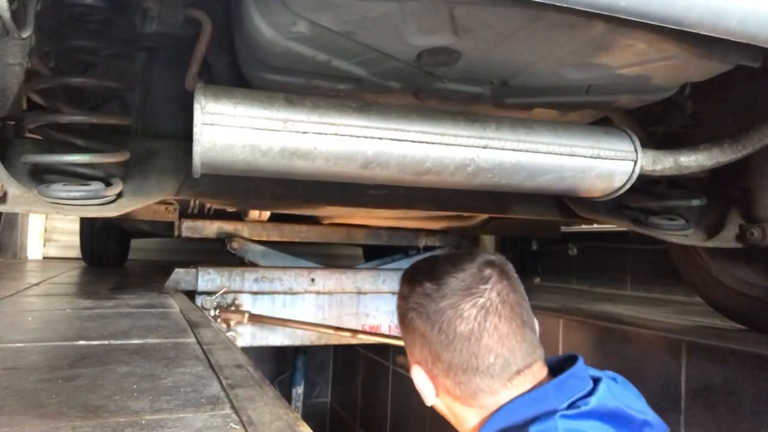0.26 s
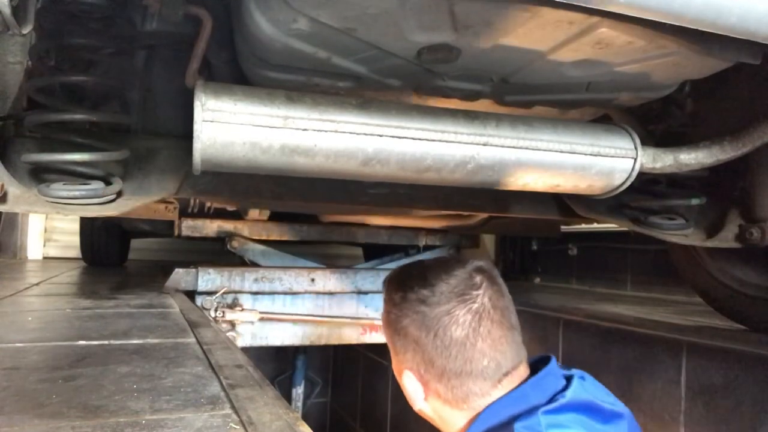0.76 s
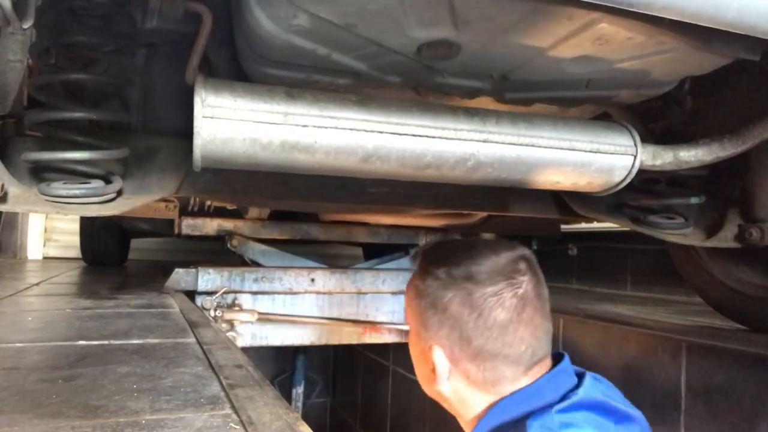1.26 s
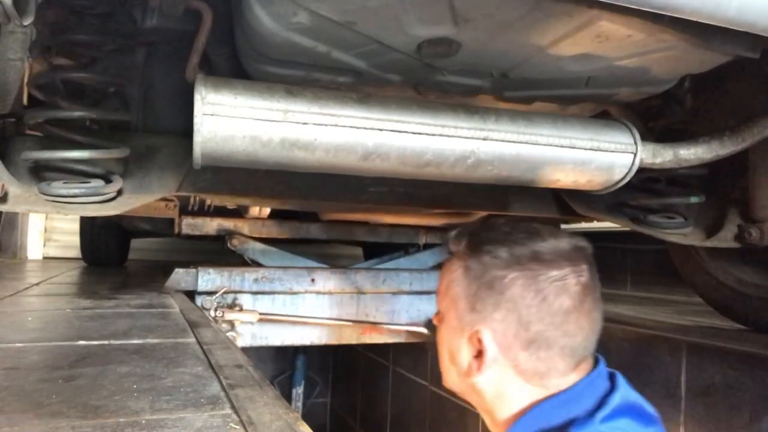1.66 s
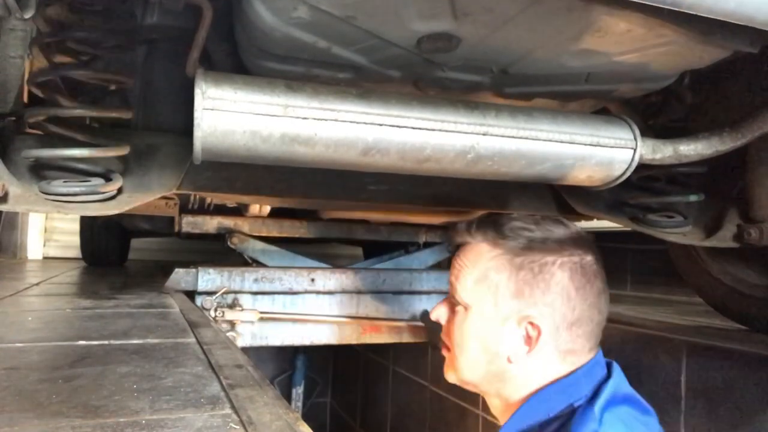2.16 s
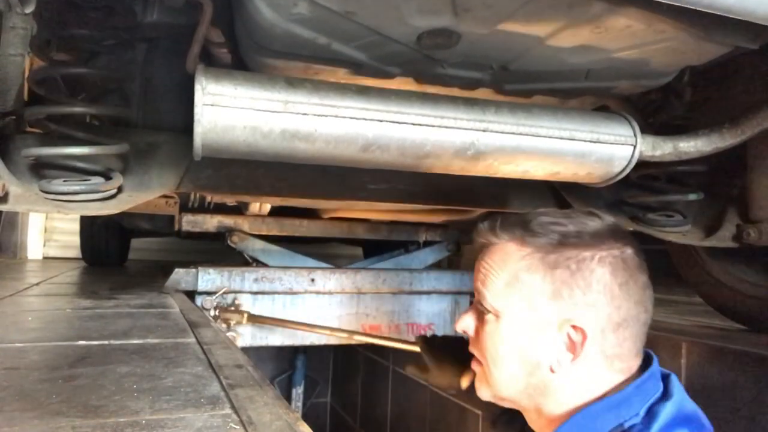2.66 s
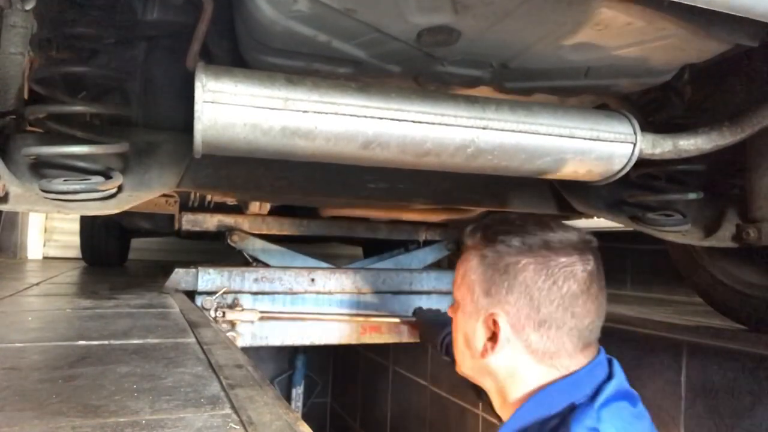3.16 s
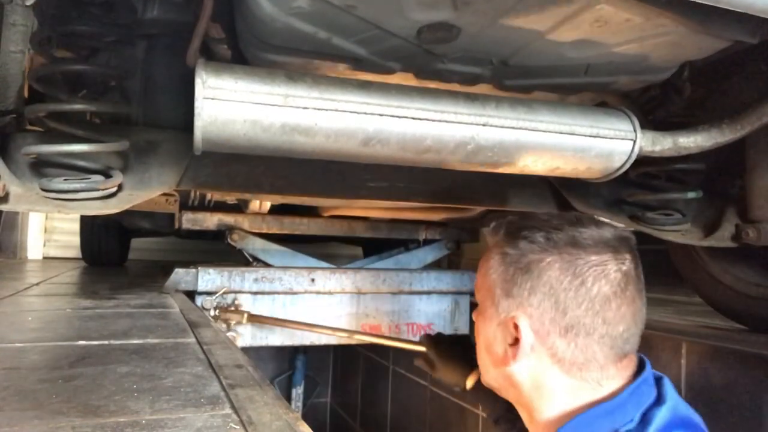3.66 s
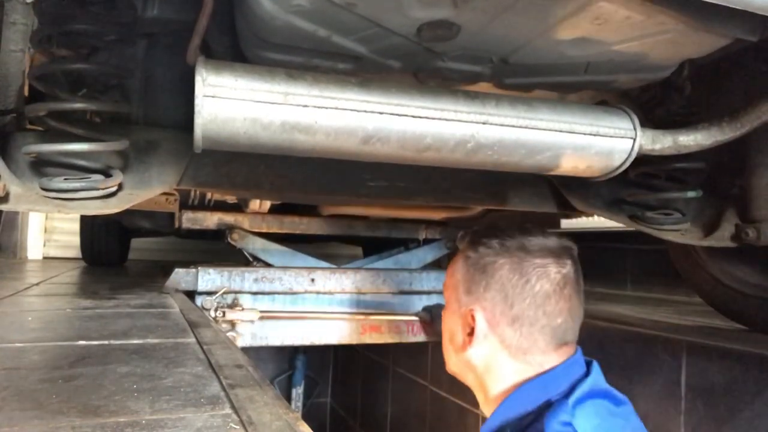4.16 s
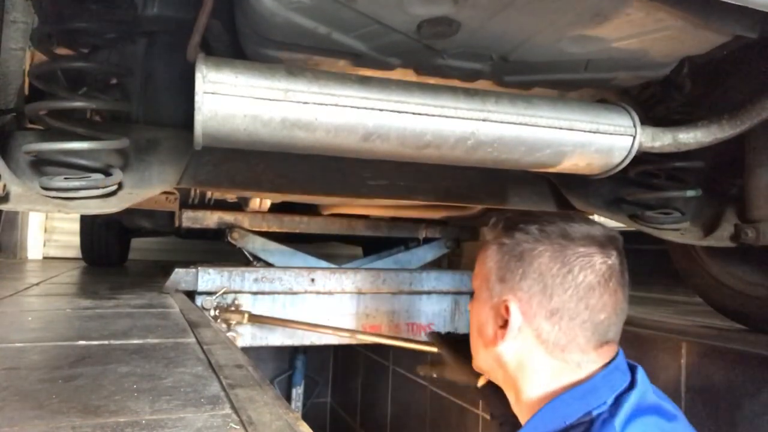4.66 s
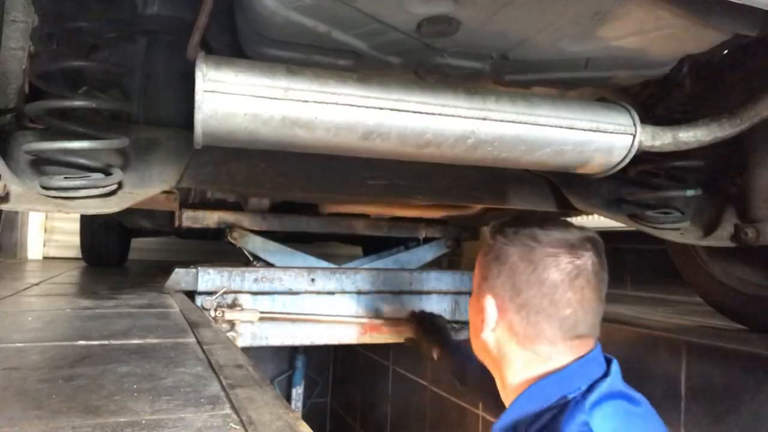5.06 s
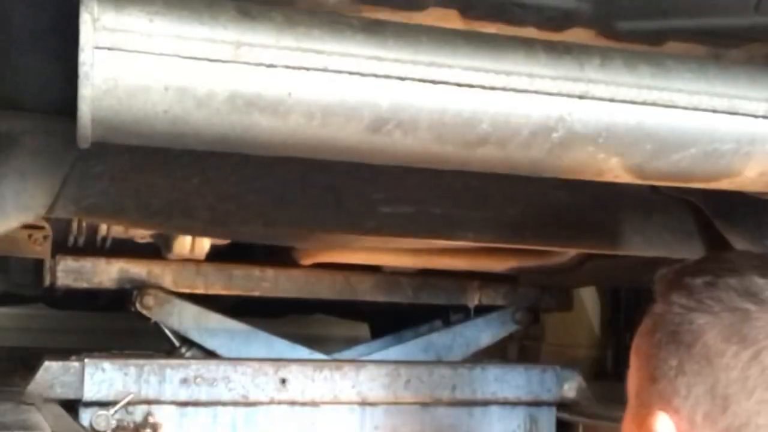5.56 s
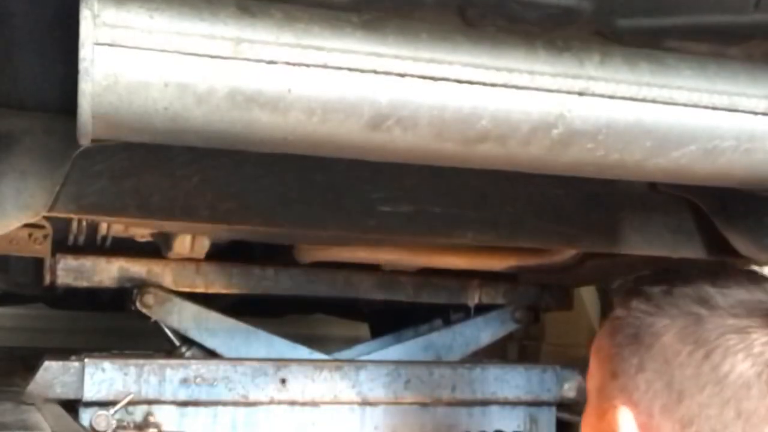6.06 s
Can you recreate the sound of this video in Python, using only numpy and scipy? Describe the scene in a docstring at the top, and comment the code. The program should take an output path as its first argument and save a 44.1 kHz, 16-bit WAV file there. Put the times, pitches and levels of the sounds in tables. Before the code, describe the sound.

A hand-pumped hydraulic scissor jack lifts a car in a garage, heard from behind the pit. From 0.1 seconds its steel lever knocks against lower and upper stops in turn, fourteen times, each with a short metallic ring. The knocks come about 0.4 seconds apart, slowing to about half a second after 3.4, with the last near 6.0. The last three upper knocks are heavier in the bass. Loose pins tick lightly just before each knock. Oil hisses faintly between strokes, with a tiny high valve whistle on each push and a soft sleeve brush on each lift. The loaded scissor arms give sharp, bright snaps at about 0.9, 3.0 and 3.6 seconds. Dull knocks fall near 0.4, 2.8 and 3.7, with the strongest at 5.7. Underneath are quiet, steady garage air and a low rumble that swells after the heavy blows.

```python
"""The steel lever of a hand-pumped hydraulic scissor jack knocks as it lifts a car over a garage pit.
The lever hits a stop at the end of every down and up stroke, which sets the jack's frame ringing.
Its loose pins tick, oil hisses and whistles through the valves, and a sleeve brushes on each lift.
Now and then the loaded scissor arms slip with a sharp snap, or the car or the lever gives a dull knock.
Under it all lie steady garage air and a low rumble that the heavy blows stir up."""
import sys
import numpy as np
from scipy import signal
from scipy.io import wavfile
from scipy.ndimage import uniform_filter1d

SR = 44100
rng = np.random.default_rng(int(sys.argv[2]) if len(sys.argv) > 2 else 0)


def dump_mix(stems):
    """Bounce the given channels to the path in sys.argv[1] as a 16-bit WAV at rate SR."""
    frames = np.atleast_2d(stems).T  # one column per channel
    limited = np.clip(frames, -1, 1)  # hard clip at full scale
    pcm = np.round(limited * 32767).astype(np.int16)
    wavfile.write(sys.argv[1], SR, pcm)


N = 278712
TIME = np.arange(N) / SR
AGE = np.arange(int(.8 * SR)) / SR   # seconds since one sound began
BAND_EDGES_HZ = np.r_[np.geomspace(22, 5600, 25), 6600, 7700, 8900, 10000, 11300, 13500, 16500]
BAND_HZ = np.sqrt(BAND_EDGES_HZ[1:] * BAND_EDGES_HZ[:-1])
BLOW_SCATTER_DB = 1.5   # how much each ringing tone varies from blow to blow

# Thud, clang and edge mean extra bass, middle and treble. Slack is the time from first pin tick to stop.
# The lever hits its lower stop: start_s, strength_db, thud_db, clang_db, edge_db,
# slack_s, first_pin_db, second_pin_db, pin_edge_db, refill_hiss_db
DOWN_STOPS = [(0.095, 1.5, 0, -2.5, -12, 0.03, -3, 8, -8.5, -65.5),
              (0.897, 3, -1.5, -3.5, 0.5, .028, 2.5, 4.5, -7, -64),
              (1.729, 4, -1.5, -4.5, -3, 0.068, -13, 0.5, -22, -58.5),
              (2.55, 5, -2, -5, -3, 0.074, -11.5, 2, -16, -61),
              (3.419, 1, -1.5, -5, -2, 0.055, -2, -7.5, -12, -56),
              (4.457, 1.5, -2, -6, -3, 0.056, -1, 2, -10.5, -56.5),
              (5.516, 0.5, -3.5, -5.5, -7, 0.056, -4.5, 3, -4, -57.5)]
# The lever hits its upper stop: start_s, strength_db, thud_db, clang_db, edge_db,
# slack_s, first_pin_db, second_pin_db, pin_edge_db, sleeve_db, whistle_db, whistle_length_s
UP_STOPS = [(0.459, 2, 0.5, -3.5, -10, .076, -3, -4, -1.5, -66, -65, 0.072),
            (1.309, 1.5, -2, -1.5, -9, 0.075, -1.5, 1.5, -24, -65, -67, .07),
            (2.132, 2, 0.5, -2, -8.5, .080, -3.5, 7, -7.5, -66, -67.5, 0.059),
            (2.977, 1, 1, 1, -9, 0.059, -3.5, -3, -13, -70, -76, 0.063),
            (3.946, -1, 8, 3, -6.5, .099, 4.5, -5.5, -6.5, -71, -67, .045),
            (5.016, 1, 7.5, -0.5, -10, 0.11, 1, -6.5, -9.5, -63, -67.5, 0.062),
            (6.042, -0.5, 7, 2.5, -8, .086, 2.5, -6.5, -10, -76, -68.5, 0.11)]
# The scissor joints slip: start_s, strength_db, thud_db, clang_db, edge_db, top_db (extra above 10 kHz)
SNAPS = [(.926, 3.5, 2.5, 0, -4.5, 2.5), (3.020, -19, -9.5, 9.5, 7, -0.5), (3.032, -6, 4.5, -4, 3.5, -6.5),
         (3.582, -1, -0.5, -0.5, -0.5, -9)]
# Dull knocks: the load shifts, or the lever knocks softly just before its upper stop:
# start_s, strength_db, thud_db, clang_db, edge_db
THUMPS = [(.425, -8.5, -2, -6, -18), (2.758, -6, 4, 2.5, -1.5), (2.871, -19.5, 14.5, 4.5, 0),
          (3.191, -30, 8, 14, 3), (3.655, -10.5, 6, 9, -2), (4.015, -17.5, 17.5, 17.5, -0.5),
          (5.266, -31, -1.5, 14.5, -3.5), (5.745, 4, -1, -1.5, -8)]
# Modes (natural ringing tones) of frame and lever; t60 is the time to fade by 60 dB:
# pitch_hz, t60_s, down_stop_db, up_stop_db, thump_db, tick_db
FRAME_MODES = [(79, .35, -34, -41, -35, -65), (112, .7, -48, -37, -36, -65), (128, .4, -46, -41, -50, -65),
               (185, .4, -36, -35, -46, -60), (298, .45, -38, -40, -39, -56), (333, .7, -48, -48, -51, -60),
               (392, .35, -42, -52, -48, -60), (426, .3, -40, -44, -39, -58),
               (530, .27, -38, -35, -55, -52), (545, .3, -41, -36, -48, -55),
               (562, .31, -28, -31, -32, -52), (598, .28, -36, -50, -42, -60),
               (617, .3, -29, -36, -36, -58), (666, .32, -33, -37, -37, -56), (722, .3, -50, -41, -41, -58),
               (1034, .38, -41, -50, -44, -58), (1047, .3, -48, -43, -50, -60),
               (1131, .22, -35, -62, -50, -68), (1166, .24, -27, -60, -43, -66),
               (1236, .2, -40, -47, -52, -64), (1280, .22, -43, -54, -50, -66),
               (1810, .2, -41, -52, -46, -66), (2220, .2, -42, -52, -47, -64),
               (2820, .18, -39, -45, -75, -53), (2880, .15, -35, -41, -70, -52),
               (3080, .13, -40, -27.5, -70, -51), (3780, .17, -43, -49, -70, -62),
               (3950, .17, -40, -45, -70, -59), (5367, .16, -42, -58, -80, -68)]


def from_db(db):
    """Turn decibels into a gain to multiply by."""
    return 10 ** (np.asarray(db) / 20)


def rms_one(x):
    """Scale a signal so that its average power is 1."""
    return x / np.sqrt(np.mean(x ** 2) + 1e-20)


def at_hz(points, hz):
    """Read between the points of a curve, on a log-frequency axis."""
    points = np.array(points)
    return np.interp(np.log(hz), np.log(points[:, 0]), points[:, 1])


def fade(t60):
    """Curves that fall by 60 dB in t60 seconds, one row per value."""
    return np.exp(-np.log(1000) * AGE / np.reshape(t60, (-1, 1)))


def swell(seconds):
    """Curves that rise from 0 towards 1, one row per rise time."""
    return 1 - np.exp(-AGE / np.reshape(seconds, (-1, 1)))


def add(out, start_s, sound):
    """Mix a sound in at its start time."""
    i = int(round(start_s * SR))
    out[i:i + len(sound)] += sound[:N - i]


def noise_bands():
    """White noise split into bands from low to high, neighbours unrelated."""
    white = rng.standard_normal((2, N))
    filters = [signal.butter(3, BAND_EDGES_HZ[k:k + 2], "band", fs=SR, output="sos")
               for k in range(len(BAND_HZ))]
    return np.array([signal.sosfilt(sos, white[k % 2]) for k, sos in enumerate(filters)])


def noise_piece(bands):
    """A random piece of the noise bands, as long as one blow."""
    i = rng.integers(SR // 10, N - len(AGE))
    return bands[:, i:i + len(AGE)]


def wobble(samples):
    """A random wavering: noise smoothed over this many samples."""
    return rms_one(uniform_filter1d(rng.standard_normal(len(AGE)), size=samples))


def colour(hz, thud_db, clang_db, edge_db):
    """Gains that lean a sound towards bass, middle or treble."""
    curve = [(150, thud_db), (500, clang_db), (1200, clang_db), (2200, 0), (4000, 0), (7500, edge_db)]
    return from_db(at_hz(curve, hz))


def garage(bands, air_db=-56.5, rest_db=-61, stirred_db=-49.5, boom_hz=64, boom_width_hz=8, boom_db=-5):
    """Steady air, and a rumble stirred by heavy blows that booms at the pit's lowest air resonance."""
    # Steady garage air: pitch_hz, level_db (per Hz)
    air_spectrum = [(25, -26), (45, -5), (80, 3), (200, -18.5), (320, -9), (450, -22), (600, -20.5),
                    (850, -24.5), (1050, -24.5), (1500, -30.5), (4000, -35.5), (8000, -38), (10000, -42.5),
                    (15500, -44)]
    air = rms_one(from_db(at_hz(air_spectrum, BAND_HZ)) @ bands[:, ::-1])
    bass_filter = signal.butter(2, [55, 200], "band", fs=SR, output="sos")
    rumble = rms_one(signal.sosfilt(bass_filter, rng.standard_normal(N)))
    boom = rms_one(signal.lfilter(*signal.iirpeak(boom_hz, boom_hz / boom_width_hz, fs=SR), rumble))
    power = np.full(N, from_db(rest_db) ** 2)
    stir = (swell(seconds=0.04) * fade(t60=1.16))[0]
    for start_s, strength_db, thud_db, *_ in DOWN_STOPS + UP_STOPS + THUMPS + SNAPS:
        add(power, start_s, (from_db(stirred_db + strength_db + thud_db) * stir) ** 2)
    return from_db(air_db) * air + np.sqrt(power) * rms_one(rumble + from_db(boom_db) * boom)


def sleeve(bands, lead_s=.19, length_s=0.36, grain_db=3):
    """Cloth brushes in a short, grainy swell as the arm comes to the top of each stroke."""
    # Rustling cloth: pitch_hz, level_db (per Hz)
    cloth_spectrum = [(2000, -24), (6000, -2), (8500, -4), (10000, -14), (12000, -4), (15500, -25)]
    out = np.zeros(N)
    for stop_s, *_, level_db, _, _ in UP_STOPS:
        grain = from_db(grain_db * wobble(150))
        rustle = from_db(at_hz(cloth_spectrum, BAND_HZ)) @ noise_piece(bands)
        brush = rms_one(grain * rustle)[:int(length_s * SR)]
        envelope = np.sin(np.linspace(0, np.pi, len(brush)))
        add(out, stop_s - lead_s, from_db(level_db) * brush * envelope)
    return out


def valve_whistle(start_hz=10200, end_hz=9050, waver_hz=140, settle_s=.022, delay_s=0.168):
    """Early in each push a valve gives a faint, unsteady whistle that glides down and settles."""
    out = np.zeros(N)
    glide_hz = end_hz + (start_hz - end_hz) * np.exp(-AGE / settle_s)
    for stop_s, *_, level_db, length_s in UP_STOPS:
        hz = glide_hz + waver_hz * wobble(60)
        tone = np.sin(2 * np.pi * np.cumsum(hz) / SR)
        envelope = np.sin(np.pi * np.minimum(AGE / length_s, 1))
        add(out, stop_s + delay_s, from_db(level_db) * envelope * tone)
    return out


def surges(peaks, rise_db_per_s, fall_db_per_s):
    """Gain of a flow that swells to each peak (time_s, level_db) and dies away."""
    curves_db = [db + np.minimum(rise_db_per_s * (TIME - s), fall_db_per_s * (s - TIME))
                 for s, db in peaks]
    return from_db(np.max(curves_db, axis=0))


def oil_hiss(bands, refill_peak_share=0.28, refill_edge_db=3, push_db=-63, push_delay_s=0.078):
    """Oil hisses through the valves: brightly as the rising lever refills the pump, softly on the push."""
    # Flowing oil: pitch_hz, level_db (per Hz)
    hiss_spectrum = [(900, 0.5), (2000, 4.5), (3000, 3), (4200, -1), (5600, 2), (7000, -3), (8200, -4),
                     (10000, -23.5), (12000, -8), (15500, -17.5)]
    # The inlet valve rings during the refill: pitch_hz, width_hz, level_db
    inlet_resonances = [(2900, 79, -7), (4050, 95, -6.5), (5170, 91, -8.5), (7560, 110, -5.5)]
    refill_peaks = [(down[0] + refill_peak_share * (up[0] - down[0]), down[-1])
                    for down, up in zip(DOWN_STOPS, UP_STOPS)]
    push_peaks = [(stop_s + push_delay_s, push_db) for stop_s, *_ in UP_STOPS]
    refill = surges(refill_peaks, rise_db_per_s=71.5, fall_db_per_s=123.5)
    push = surges(push_peaks, rise_db_per_s=34.5, fall_db_per_s=76)
    white = rng.standard_normal(N)
    inlet = sum(from_db(db) * rms_one(signal.lfilter(*signal.iirpeak(hz, hz / width, fs=SR), white))
                for hz, width, db in inlet_resonances)
    gains = from_db(at_hz(hiss_spectrum, BAND_HZ))
    bright_hiss = rms_one((gains * colour(BAND_HZ, 0, 0, refill_edge_db)) @ bands)
    return push * rms_one(gains @ bands) + refill * (inlet + bright_hiss)


def ring_shape(spectrum, decay_scale, rise_s, crack_db, room_db):
    """Each band's loudness after a blow: a bright crack, ringing steel, then the garage's echo."""
    # How long the steel rings, before decay_scale: pitch_hz, t60_s
    ring_times = [(60, 0.45), (500, 0.29), (1300, 0.25), (3500, 0.23), (8000, 0.19), (12000, 0.15)]
    treble = BAND_HZ / (BAND_HZ + 2000)
    crack = from_db(crack_db) * fade(t60=0.027) * treble[:, None]
    steel = fade(decay_scale * at_hz(ring_times, BAND_HZ))
    room = from_db(room_db) * fade(t60=0.77)
    build_up = swell(rise_s + np.minimum(12.5 / BAND_HZ, .012))   # the lows build up last
    return from_db(at_hz(spectrum, BAND_HZ))[:, None] * (crack + np.hypot(steel, room) * build_up)


def scissor_snaps(bands, modes_db=17, middle_t60_s=.21, boom_hz=63, boom_db=-47):
    """A loaded joint slips and the steel arms ring, hard and bright; the car body booms faintly."""
    # Noisy ring of a snap: pitch_hz, level_db (per Hz)
    snap_spectrum = [(25, -39), (70, -29), (500, -20.5), (900, -19), (2200, -8.5), (4000, -6), (6000, -9.5),
                     (7200, -13.5), (8400, -10), (9800, -43.5), (12500, -17), (15500, -31.5)]
    # Ringing tones of the scissor arms: pitch_hz, level_db
    arm_modes = [(1400, -51), (1776, -48), (2159, -46), (2390, -48), (2444, -45), (2762, -46), (3365, -45),
                 (3445, -47), (3661, -45), (4043, -45), (4382, -47), (4587, -52), (4646, -45), (4748, -50),
                 (4899, -47), (5367, -48), (5862, -51), (5900, -51), (6083, -49), (6196, -49), (6643, -53),
                 (7407, -53), (7725, -50), (7919, -51), (8253, -50), (8796, -52)]
    out = np.zeros(N)
    shape = ring_shape(snap_spectrum, decay_scale=0.98, rise_s=0.0024, crack_db=-2, room_db=-36)
    hz, level_db = np.array(arm_modes).T
    t60_s = middle_t60_s * (np.median(hz) / hz) ** 0.15   # high tones die sooner
    envelopes = fade(t60_s) * swell(seconds=0.005)
    boom_envelope = fade(4.9)[0] * (1 - (AGE / AGE[-1]) ** 2)   # a slow fade, eased to silence
    boom = from_db(boom_db) * boom_envelope * np.sin(2 * np.pi * boom_hz * AGE)
    for start_s, strength_db, thud_db, clang_db, edge_db, top_db in SNAPS:
        lean_db = thud_db, clang_db, edge_db
        scatter_db = BLOW_SCATTER_DB * rng.standard_normal(len(hz))
        gains = from_db(level_db + modes_db + scatter_db) * colour(hz, *lean_db)
        phases = 2 * np.pi * (hz[:, None] * AGE + rng.random((len(hz), 1)))
        tones = gains @ (envelopes * np.sin(phases))
        band_gains = colour(BAND_HZ, *lean_db) * from_db(top_db * (BAND_HZ > 10000))
        ring = band_gains @ (shape * noise_piece(bands))
        add(out, start_s, from_db(strength_db) * (tones + ring + from_db(thud_db) * boom))
    return out


def frame_blows(bands, blows, shape, levels_db, shared_share, cluster_size=5, pitch_spread=.009):
    """Each blow on the jack wakes a noisy ring and the frame's tones, a little differently each time."""
    out = np.zeros(N)
    shared_noise = noise_piece(bands)   # the same contact rings much the same way
    hz, t60_s = np.array(FRAME_MODES)[:, :2].T
    copies = np.where(hz > 1500, cluster_size, 1)   # the high tones crowd into close clusters
    hz, t60_s, levels_db, copies = np.repeat(np.c_[hz, t60_s, levels_db, copies], copies, axis=0).T
    hz = hz * (1 + pitch_spread * (copies > 1) * rng.standard_normal(len(hz)))
    rise_s = np.minimum(4.6 / hz, .012)
    envelopes = fade(t60_s) * swell(rise_s) / np.sqrt(copies)[:, None]
    modes = envelopes * np.exp(2j * np.pi * hz[:, None] * AGE)
    for start_s, strength_db, *lean_db in blows:
        noise = np.sqrt(shared_share) * shared_noise + np.sqrt(1 - shared_share) * noise_piece(bands)
        ring = colour(BAND_HZ, *lean_db) @ (shape * noise)
        scatter_db = BLOW_SCATTER_DB * rng.standard_normal(len(hz))
        gains = from_db(levels_db + scatter_db) * colour(hz, *lean_db)
        random_phases = np.exp(2j * np.pi * rng.random(len(hz)))
        tones = ((gains * random_phases) @ modes).imag
        add(out, start_s, from_db(strength_db) * (ring + tones))
    return out


def slack_ticks(stops, second_lead_share, second_brighter_db=6.5):
    """Two pins tick in turn ahead of each stop: rows of start_s, strength_db, edge_db."""
    stop_s, *_, slack_s, first_db, second_db, edge_db = np.array(stops)[:, :9].T
    first = zip(stop_s - slack_s, first_db, edge_db)
    second = zip(stop_s - second_lead_share * slack_s, second_db, edge_db + second_brighter_db)
    return [*first, *second]


def loose_pins(bands, thud_db=1, clang_db=1):
    """Loose pins give light, bright ticks as the lever's linkage takes up its slack."""
    # Stray ticks of the linkage: start_s, strength_db, edge_db
    stray_ticks = [(0.495, -3.8, 9.5), (0.511, 2, -7), (2.686, -6, -2), (3.291, -12.5, 10),
                   (4.007, 6.5, -1.5), (5.56, -4.5, 7), (6.186, -13, 7)]
    # Noisy ring of a tick: pitch_hz, level_db (per Hz)
    tick_spectrum = [(60, -29.5), (550, -33.5), (900, -49), (2000, -39.5), (3000, -38), (5000, -43),
                     (8000, -44), (10000, -69), (12000, -53), (15000, -68.5)]
    shape = ring_shape(tick_spectrum, decay_scale=0.99, rise_s=0.00027, crack_db=-6, room_db=-18)
    rows = slack_ticks(DOWN_STOPS, .41) + slack_ticks(UP_STOPS, .6) + stray_ticks
    ticks = [(start_s, strength_db, thud_db, clang_db, edge_db) for start_s, strength_db, edge_db in rows]
    tick_db = np.array(FRAME_MODES)[:, -1]
    return frame_blows(bands, ticks, shape, tick_db + 0.5, shared_share=0.6)


def dull_knocks(bands, lead_in_slacks=1.33):
    """The car shifts or the rising lever knocks softly; the linkage nudges the frame at each turn."""
    # The soft nudge ahead of a down stop and of an up stop: strength_db, thud_db, clang_db, edge_db
    down_nudge = (-27.5, 12.5, 1.5, 4)
    up_nudge = (-23, 2, 3.5, 3)
    # Noisy ring of a thump: pitch_hz, level_db (per Hz)
    thump_spectrum = [(25, -43.5), (80, -18.5), (300, -19), (650, -16.5), (850, -23.5), (1700, -24.5),
                      (2300, -28.5), (3000, -42.5), (5000, -51), (15000, -55)]
    nudges = [(stop_s - lead_in_slacks * slack_s, *nudge)
              for stops, nudge in [(DOWN_STOPS, down_nudge), (UP_STOPS, up_nudge)]
              for stop_s, _, _, _, _, slack_s, *_ in stops]
    shape = ring_shape(thump_spectrum, decay_scale=0.78, rise_s=0.0023, crack_db=-3, room_db=-24.5)
    thump_db = np.array(FRAME_MODES)[:, 4]
    return frame_blows(bands, THUMPS + nudges, shape, thump_db - 3.5, shared_share=.15)


def lever_knocks(bands):
    """The steel lever hits its lower and upper stops in turn, and each stop has its own ring."""
    # Noisy ring of the lower stop and of the upper stop: pitch_hz, level_db (per Hz)
    down_spectrum = [(25, -34), (55, -42), (130, -16.5), (240, -21.5), (520, -6.5), (850, -18.5),
                     (1250, -15), (1600, -27.5), (2900, -25.5), (4200, -28.5), (6500, -35), (8500, -50.5),
                     (10000, -64.5), (15000, -59)]
    up_spectrum = [(25, -28), (55, -22), (140, -22.5), (250, -23), (560, -15), (850, -26), (2200, -30.5),
                   (3100, -25.5), (4800, -37.5), (8000, -33), (10000, -62.5), (15000, -50.5)]
    down_shape = ring_shape(down_spectrum, decay_scale=0.85, rise_s=.0005, crack_db=4.5, room_db=-22)
    up_shape = ring_shape(up_spectrum, decay_scale=1, rise_s=0.00025, crack_db=5, room_db=-31)
    down_db, up_db = np.array(FRAME_MODES)[:, 2:4].T
    down = frame_blows(bands, [row[:5] for row in DOWN_STOPS], down_shape, down_db - 1, shared_share=0.31)
    up = frame_blows(bands, [row[:5] for row in UP_STOPS], up_shape, up_db - 4.5, shared_share=0.45)
    return down + up


def scene():
    """All the sources in one channel, heard from behind the pit."""
    bands = noise_bands()
    steel = lever_knocks(bands) + dull_knocks(bands) + loose_pins(bands) + scissor_snaps(bands)
    return (steel + oil_hiss(bands) + valve_whistle() + sleeve(bands) + garage(bands))[None]


def record(dry):
    """A steep filter cuts the very highest treble."""
    cutoff_hz = 15900
    return signal.sosfilt(signal.ellip(10, .1, 70, cutoff_hz, fs=SR, output="sos"), dry)


dry = scene()
out = record(dry)
dump_mix(out)
```